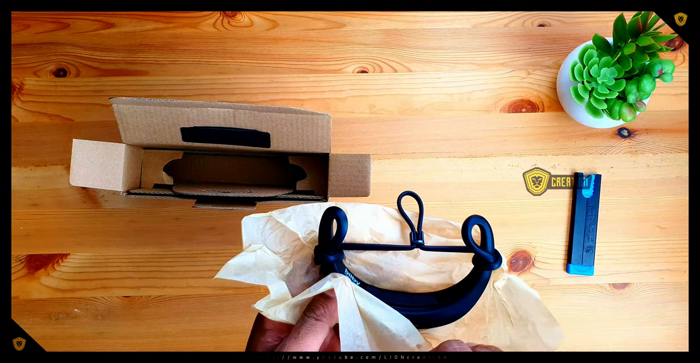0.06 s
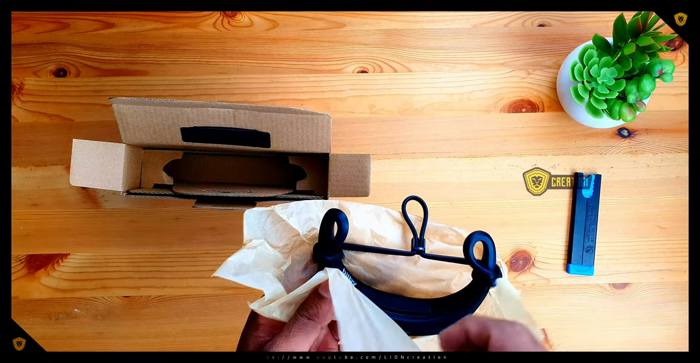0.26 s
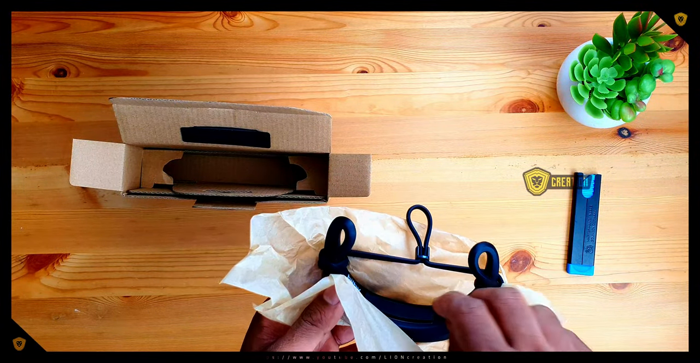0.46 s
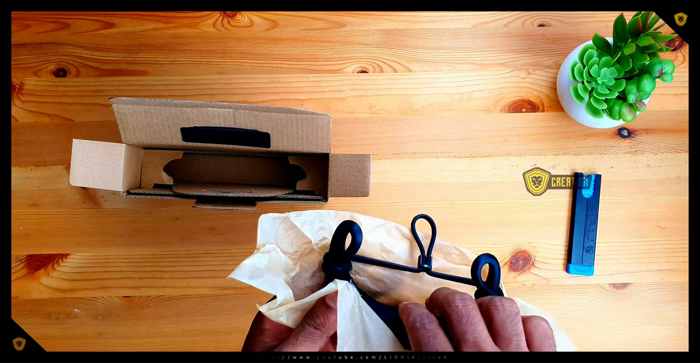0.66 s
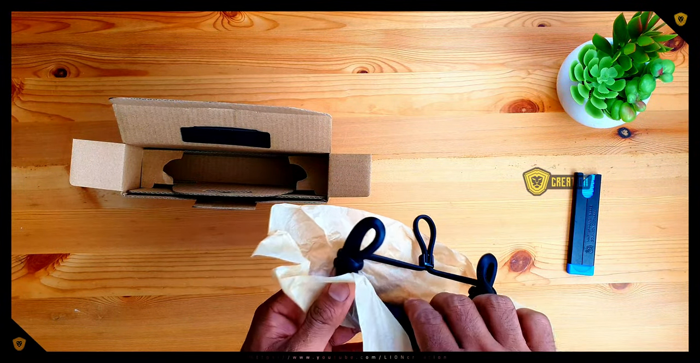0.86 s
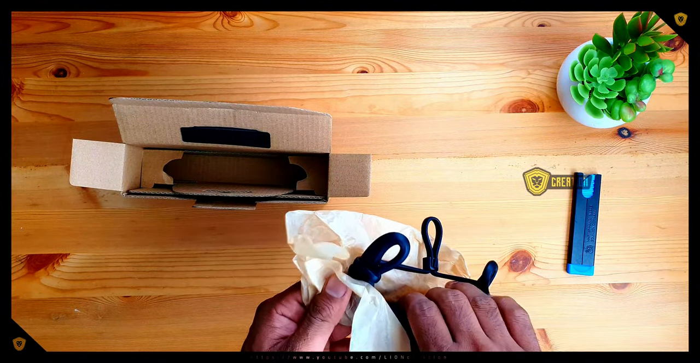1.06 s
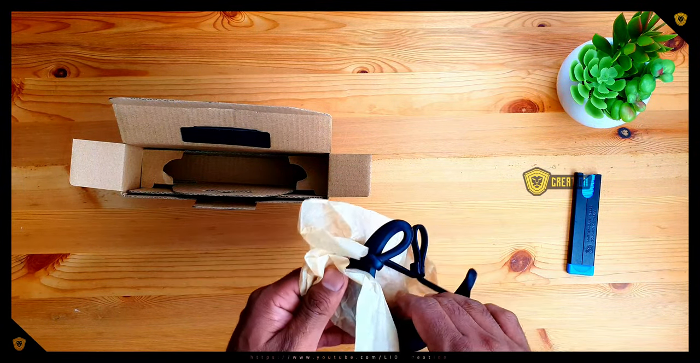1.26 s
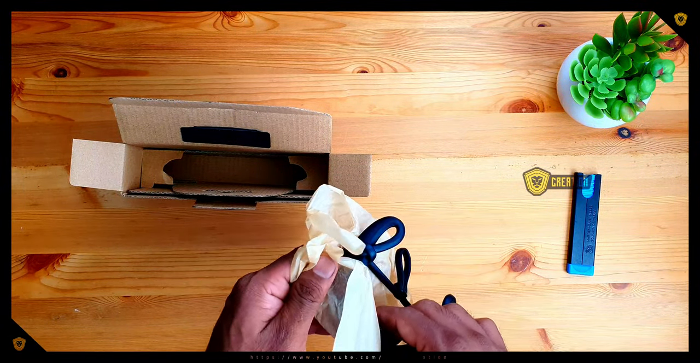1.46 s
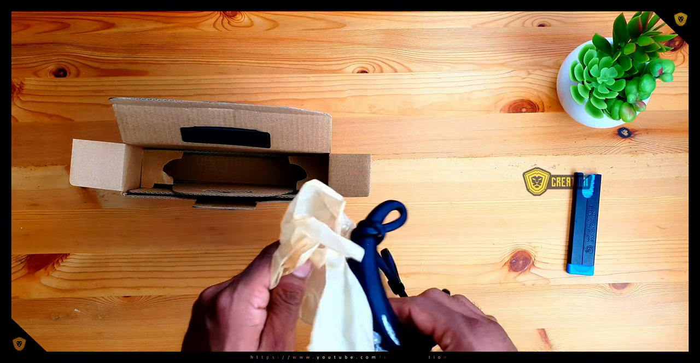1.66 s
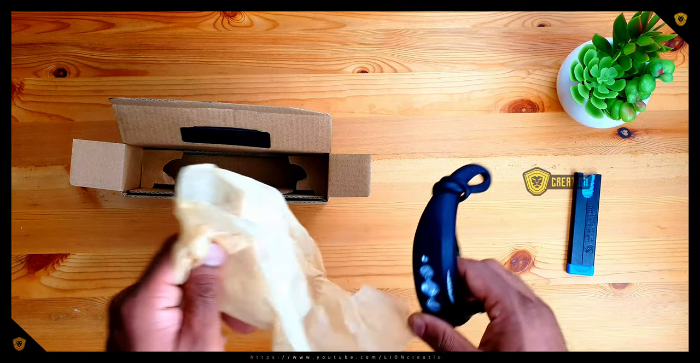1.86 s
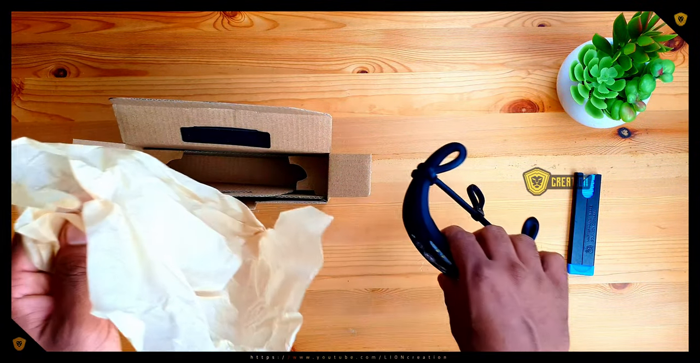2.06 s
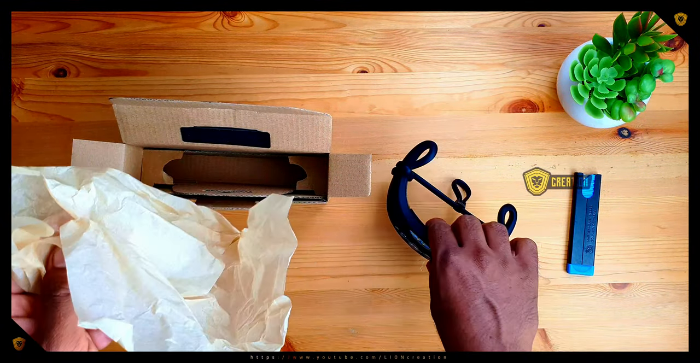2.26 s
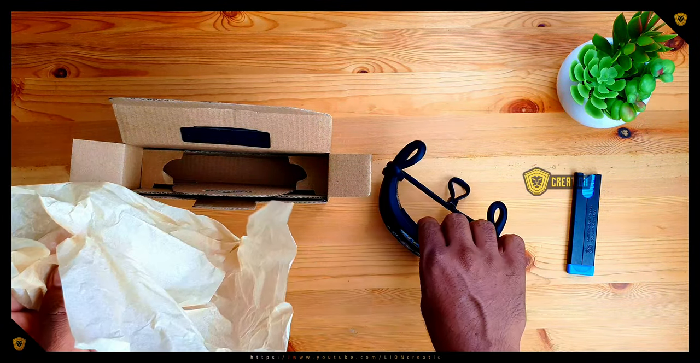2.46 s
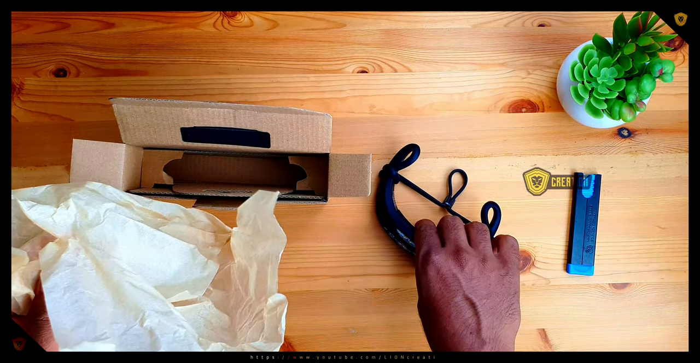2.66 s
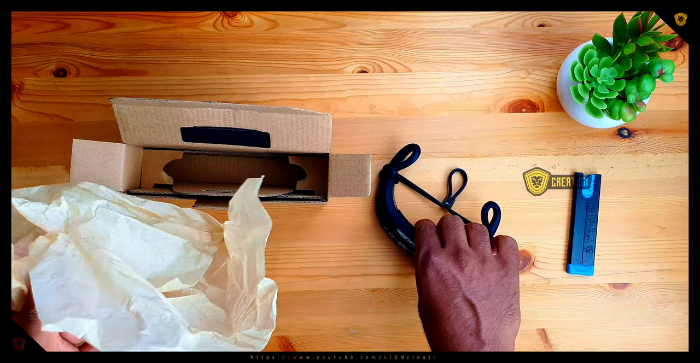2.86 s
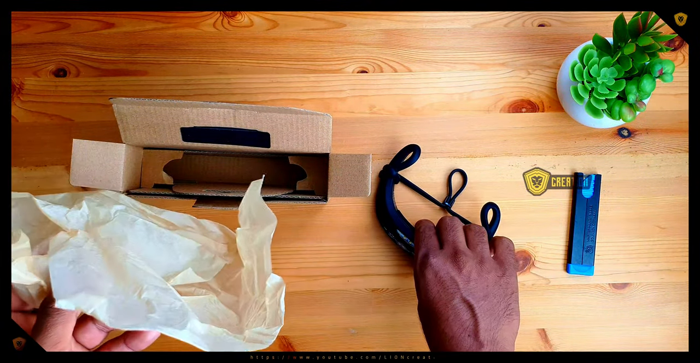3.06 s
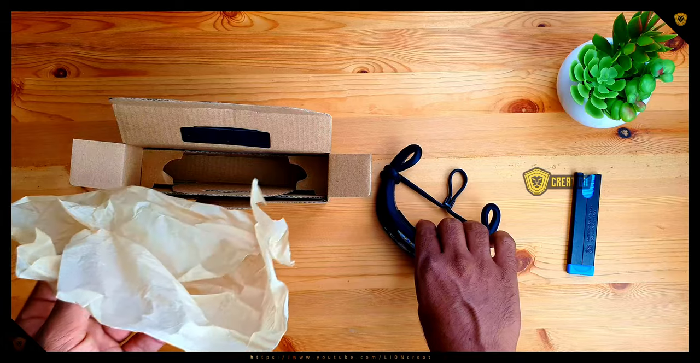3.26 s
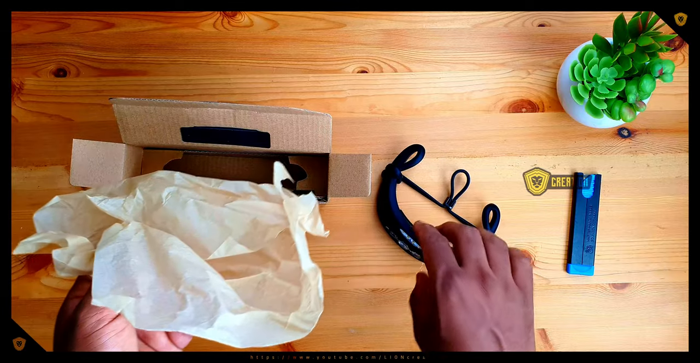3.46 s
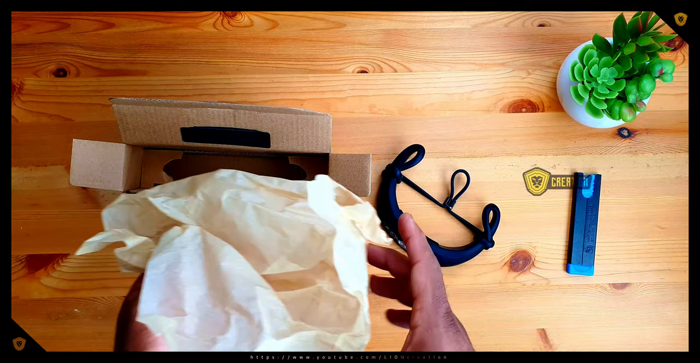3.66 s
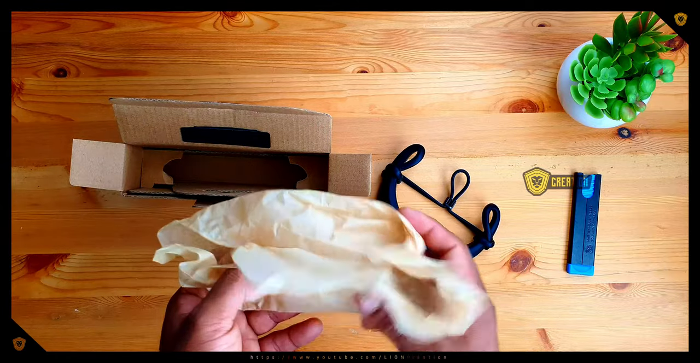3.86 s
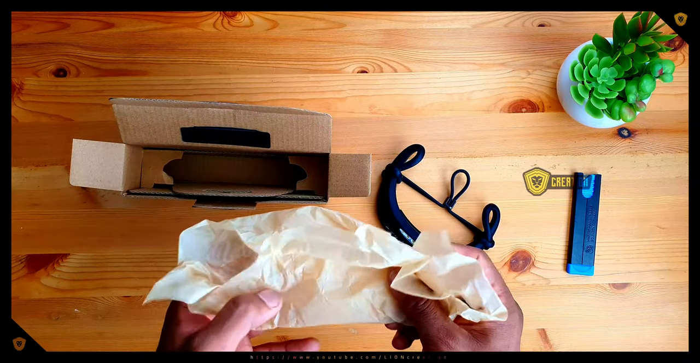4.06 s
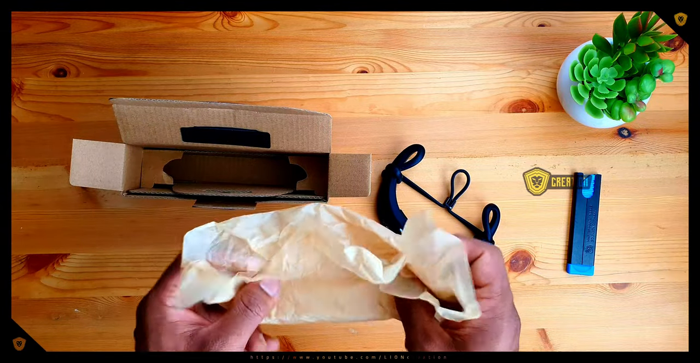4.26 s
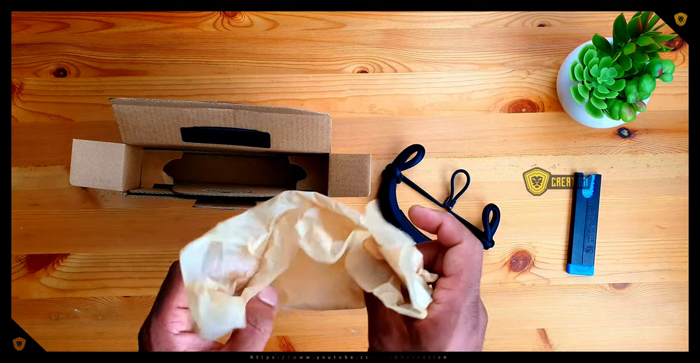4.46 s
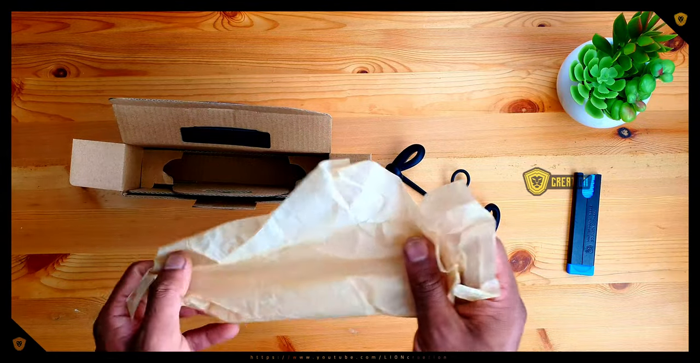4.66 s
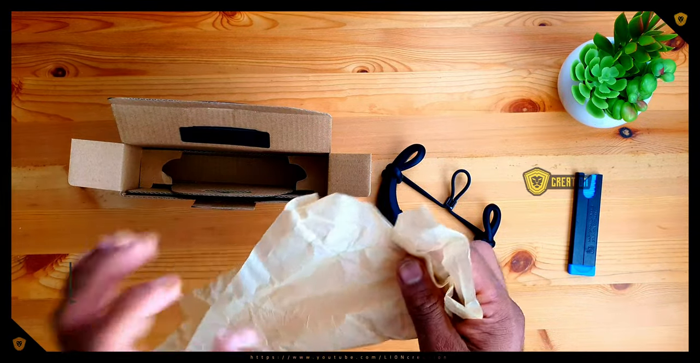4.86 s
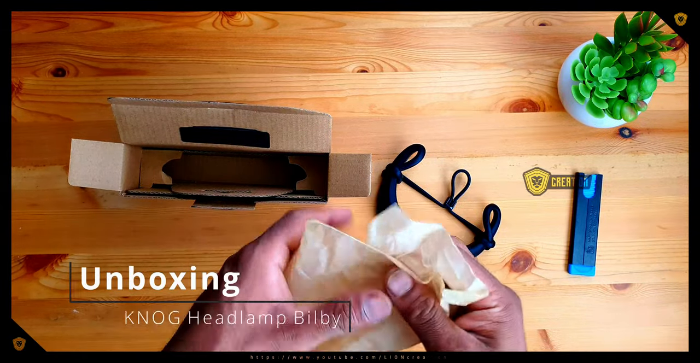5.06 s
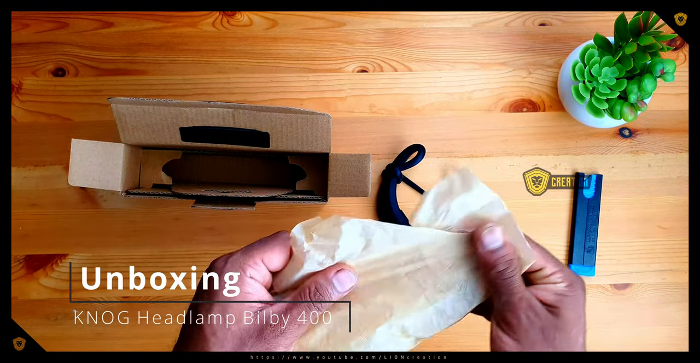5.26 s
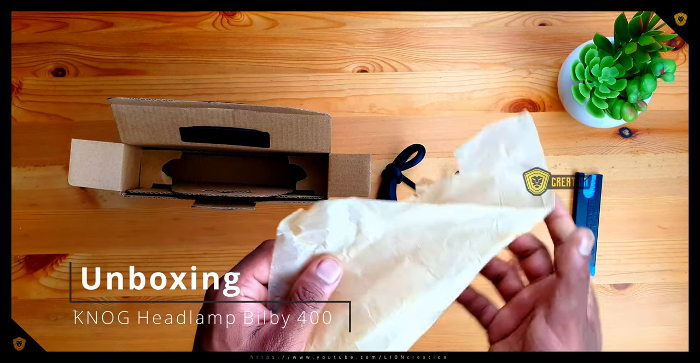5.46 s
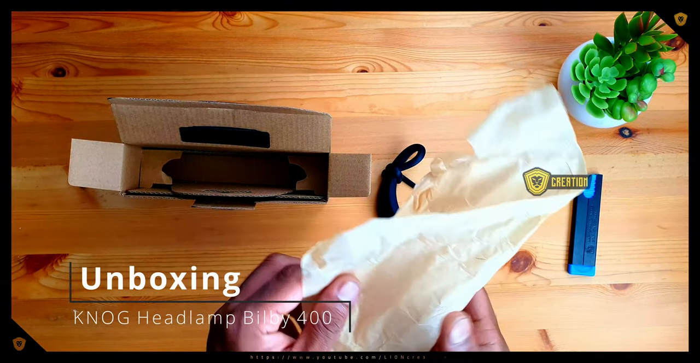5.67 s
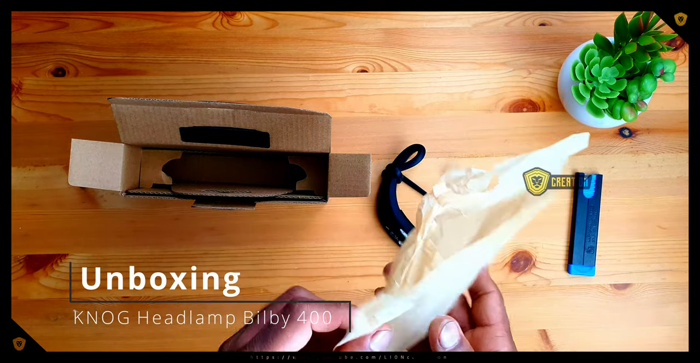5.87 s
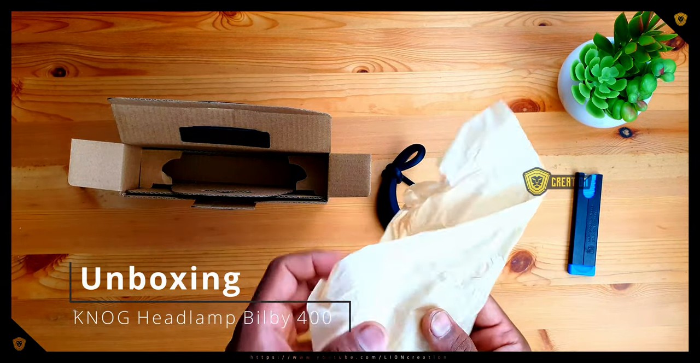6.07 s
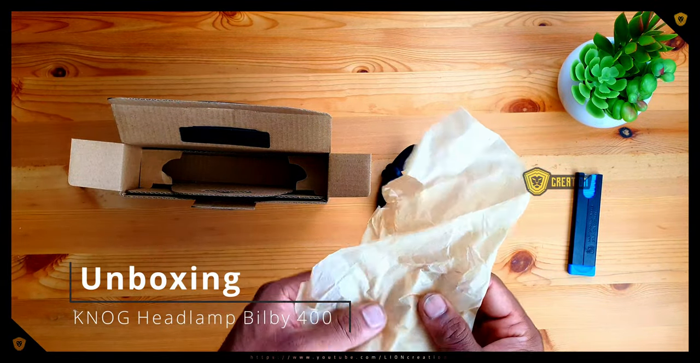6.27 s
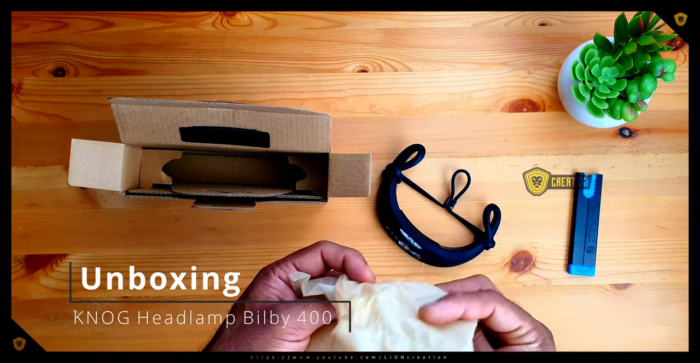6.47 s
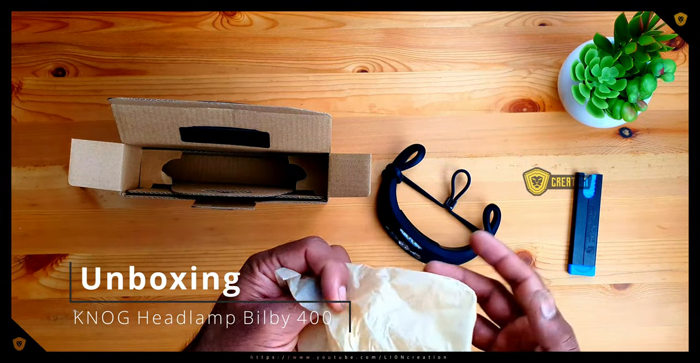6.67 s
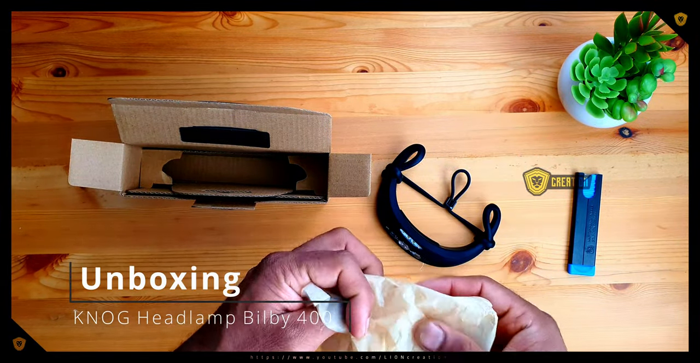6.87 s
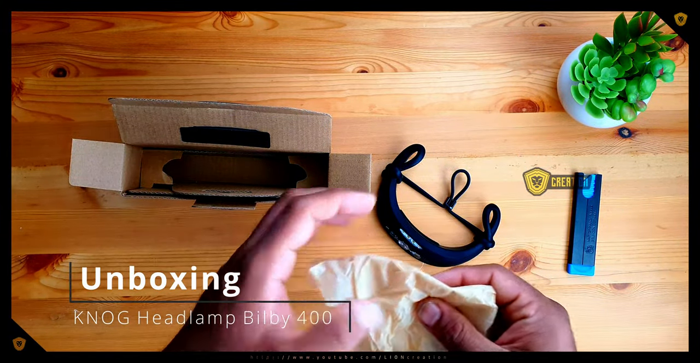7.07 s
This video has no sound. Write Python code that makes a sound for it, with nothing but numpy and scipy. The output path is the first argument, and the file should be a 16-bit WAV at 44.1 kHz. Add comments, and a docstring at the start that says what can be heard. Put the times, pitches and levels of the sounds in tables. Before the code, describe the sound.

A close, dry stereo sound of thin crisp wrapping paper handled over a wooden table in a small quiet room. At 0 s the sheet crackles with a short rasp as it drags along a strap, fading by 0.4 s. Separate creases snap at 0.3-0.7 s, then dense fizzing crinkle and sliding hiss run from about 0.8 to 1.8 s. From 1.9 to 2.4 s come brisk snaps and flutters, slightly left. It thins around 2.4-2.9 s to sparse ticks, with a soft low table bump at 2.7 s. Sharper snaps and pops gather from 3 to 3.7 s, with faint bumps near 3.4 s and light hollow carton taps at 3.15, 3.25 and a pair at 3.8 s. Bright crumpling follows almost continuously to 5.4 s, then snappier unfolding, and renewed full rustling from 5.9 s until the end at about 7.1 s.

```python
"""Thin tissue paper crackles as hands pull a strap out of it, then open, stretch and fold it over a table.
Shaped noise makes its clicks (random buckling), its fizz, its sliding hiss and its soft flutter.
Single creases snap, domes pop at a pitch, the strap rasps and a carton, flicked by the paper, taps hollowly.
Damped sine modes make soft bumps on the wooden table; sliding hands keep it booming faintly.
A short room tail and faint air noise surround the stereo pair."""
import sys
import numpy as np
from scipy import signal
from scipy.fft import rfft, irfft, next_fast_len
from scipy.io import wavfile
from scipy.ndimage import uniform_filter1d, map_coordinates

SR = 44100
rng = np.random.default_rng(int(sys.argv[2]) if len(sys.argv) > 2 else 0)


def write(x):
    x = np.atleast_2d(x).T
    wavfile.write(sys.argv[1], SR, np.round(np.clip(x, -1, 1) * 32767).astype(np.int16))


N = 313987


def amp(db):
    """Decibels to gain."""
    return 10 ** (np.asarray(db) / 20)


def unit(x):
    """x at rms 1."""
    return x / np.sqrt(np.mean(x ** 2) + 1e-20)


def along(points, hz):
    """(Hz, value) points interpolated on a log frequency axis."""
    f, v = np.transpose(points)
    return np.interp(np.log(hz + 1), np.log(f + 1), v)


def curves(rows):
    """One value per sample for each column after the time."""
    s, *cols = np.transpose(rows)
    return [np.interp(np.arange(N) / SR, s, c) for c in cols]


def wobble(knots_per_s):
    """Smooth random curve through normal-distributed knots."""
    knots = rng.standard_normal(int(N * knots_per_s / SR) + 4)
    return map_coordinates(knots, [np.arange(N) * knots_per_s / SR])


def coloured(x, level):
    """x through the causal minimum-phase filter whose gain in dB is level(Hz)."""
    n = x.shape[-1]
    m = 2 * next_fast_len(n // 2 + 2048)
    gain = amp(level(np.fft.rfftfreq(m, 1 / SR)))
    cepstrum = irfft(np.log(gain + 1e-6), m)
    # fold the cepstrum onto positive time
    cepstrum[1:m // 2] *= 2
    cepstrum[m // 2 + 1:] = 0
    response = np.exp(rfft(cepstrum))
    return irfft(rfft(x, m) * response, m)[..., :n]


def noise(spectrum):
    """Two unrelated noises of the given colour, rms 1."""
    return unit(coloured(rng.standard_normal((2, N)), lambda hz: along(spectrum, hz)))


def resonance(f, hz, width_hz):
    """Power response of one resonance, peak 1."""
    return 1 / (1 + (2 * (f - hz) / width_hz) ** 2)


def ringing(modes):
    """Two noises through a set of resonances (Hz, width Hz, dB), rms 1."""
    def level_db(f):
        power = sum(amp(2 * db) * resonance(f, hz, width_hz) ** 2 for hz, width_hz, db in modes)
        return 10 * np.log10(power)

    return unit(coloured(rng.standard_normal((2, N)), level_db))


def add(track, s, sound):
    """Mix a sound into a track from time s."""
    part = track[:, max(round(s * SR), 0):][:, :sound.shape[-1]]
    part += sound[..., :part.shape[-1]]


def handling():
    """Strokes rise, sag and die over the stirring sheet; crackle, fizz, slide, flutter as relative dB."""
    # pulls and squeezes: t/s, length/s, crackle/dB, fizz over crackle/dB, slide/dB, flutter over slide/dB
    strokes = [(0.0, 0.21, -30, -1, -35, -11), (0.223, 0.047, -32, -2, -43, -20),
               (0.471, 0.08, -33.5, -1, -46.5, -7), (0.694, 0.058, -30, -1, -32.5, -14),
               (0.797, 0.18, -31, -0.5, -35.5, -27), (1.004, 0.04, -27.5, 0, -39.5, -13),
               (1.107, 0.04, -38, 1, -40, -16), (1.16, 0.583, -31, 0.5, -36, -16),
               (1.826, 0.042, -28, -4, -39, -16), (1.977, 0.081, -30.5, -8, -38, -6),
               (2.18, 0.089, -45, -12, -41.5, -6.5), (2.957, 0.032, -37, -8, -44.5, -14),
               (3.135, 0.025, -43, -8, -40.5, -15), (3.227, 0.024, -37, -12, -37, -21),
               (3.344, 0.042, -29.5, -6.5, -39, -6.5), (3.515, 0.018, -37, -3, -47, -6),
               (3.785, 0.27, -29.5, -4.5, -35, -12.5), (4.159, 0.16, -29.5, -3.5, -34.5, -8.5),
               (4.36, 0.13, -39.5, 4.5, -34.5, -16), (4.506, 0.27, -31.5, 0.5, -35, -10.5),
               (4.818, 0.11, -33.5, -7, -40.5, -29), (4.991, 0.087, -28.5, -5.5, -37, -24),
               (5.102, 0.34, -29, -2, -33.5, -9), (5.53, 0.13, -41, 4, -48, -16),
               (5.74, 0.12, -34.5, 0.5, -47.5, -11), (5.874, 0.058, -30, -1, -35, -15),
               (5.975, 0.24, -29, -2.5, -37.5, -11.5), (6.236, 0.1, -28.5, -0.5, -34.5, -7.5),
               (6.345, 0.12, -28, -0.5, -35, -14), (6.479, 0.16, -29.5, -1.5, -38, -17),
               (6.652, 0.15, -35.5, 0, -44.5, -33), (6.862, 0.042, -26, -2, -39, -17),
               (6.909, 0.04, -28, -2, -37.5, -7), (6.966, 0.072, -31.5, -2, -40, -24),
               (7.081, 0.03, -35.5, 0, -41, -22)]
    # stirring between strokes: t/s, crackle/dB, slide/dB
    stirring = [(0, -45, -48), (0.33, -42.5, -45.5), (0.6, -45, -44.5), (0.8, -36.5, -41),
                (1.9, -34.5, -41.5), (2.1, -42, -42), (2.34, -43, -44.5), (2.42, -50.5, -43),
                (2.66, -53, -44), (2.75, -61, -52), (2.92, -53, -49.5), (3.05, -48, -44),
                (3.55, -40.5, -42), (3.61, -53, -54), (3.75, -57, -48.5), (3.9, -30, -35),
                (4.9, -32.5, -41.5), (7.12, -38.5, -49.5)]
    attack_s, release_s = 0.039, 0.11  # 60 dB ramps
    sag_db_per_s = 5.5
    stir_fizz_db, stir_flutter_db = -3, -13  # over crackle, over slide

    t = np.arange(N) / SR
    stir_db, rub_db = curves(stirring)
    power = amp([stir_db, stir_db + stir_fizz_db, rub_db, rub_db + stir_flutter_db]) ** 2
    for s, length_s, db, fizz_db, slide_db, flutter_db in strokes:
        rise_db = 60 * np.minimum(t - s, 0) / attack_s
        fall_db = -60 * np.maximum(t - s - length_s, 0) / release_s
        sag_db = -sag_db_per_s * (t - s - length_s / 2)
        shape_db = rise_db + fall_db + sag_db
        on = shape_db > -60
        gains = amp([db, db + fizz_db, slide_db, slide_db + flutter_db])
        power[:, on] += np.outer(gains, amp(shape_db[on])) ** 2
    return 10 * np.log10(power)


def buckle(t, t60, tail_db, tail_t60):
    """Envelope of one facet flipping: a short crack, then a weaker, longer shiver through the sheet."""
    crack = amp(-60 * t / t60)
    shiver = amp(tail_db - 60 * t / tail_t60)
    return (crack + shiver) / (1 + amp(tail_db))


def crackle(clicks_per_s, spread_db, clump_db):
    """Summed envelope of facets that click at random, each with its own size, rms 1."""
    rate = np.clip(clicks_per_s, 400, 8000)
    # buckling comes in avalanches, which even out when many creases move together
    clumps = amp(clump_db * wobble(70) * np.sqrt(500 / rate))
    size = amp(spread_db * np.clip(rng.standard_normal(N), -2, 2))
    struck = rng.random(N) < rate / SR
    power = struck * (size * clumps) ** 2 / rate
    click = buckle(np.arange(SR // 20) / SR, t60=0.005, tail_db=-11, tail_t60=0.06)
    return unit(np.sqrt(np.abs(signal.oaconvolve(power, click ** 2)[:N])))


def flexed(x, fold_db, bend_db):
    """A sheet changing shape shifts its colour: quickly with small folds, slowly with large bends."""
    def field(shape, bins, frames):
        across = uniform_filter1d(rng.standard_normal(shape), bins, -2)
        return unit(uniform_filter1d(across, frames, -1))

    z = signal.stft(x, nperseg=256)[2]
    folds = field(z.shape, 7, 6)
    bends = field(z.shape[1:], 5, 40)  # same in both channels
    shifted = z * amp(fold_db * folds + bend_db * bends)
    return unit(signal.istft(shifted, nperseg=256)[1][:, :N])


def rustle(crackle_db, fizz_db, slide_db, flutter_db):
    """Moving paper crackles, rubs on itself and flaps softly; a firmer stroke buckles it more finely."""
    # colours of the clicks, their fizz, the sliding and the flutter: f/Hz, relative density/dB
    crackle_colour = [(100, -61), (600, -38), (1500, -19.5), (2500, -4.5), (3300, -4), (4500, -1.5),
                      (5600, 1), (7000, 2.5), (8300, -3), (9500, -12.5), (12000, -21.5)]
    fizz_colour = [(3000, -69), (7000, -13), (8600, -1.5), (10000, 1), (11700, 4.5), (13500, 1),
                   (16000, -3)]
    slide_colour = [(100, -49), (400, -23.5), (750, -5.5), (1000, -6.5), (1300, -1.5), (1700, -1.5),
                    (2300, -6.5), (3000, 3), (4500, -5.5), (8000, -11), (16000, -32)]
    flutter_colour = [(25, -60), (50, -41), (80, -7), (120, -8), (200, -5), (300, 2.5), (550, 2),
                      (900, 3.5), (2000, -17), (8000, -48)]
    firm_slide_db, firm_clicks_per_s = -36, 3000
    rate_exponent = 1.4  # click rate against sliding amplitude

    def sheet(colour):
        return flexed(noise(colour), fold_db=1.7, bend_db=1.0)

    clicks_per_s = firm_clicks_per_s * amp(rate_exponent * (slide_db - firm_slide_db))
    grain = crackle(clicks_per_s, spread_db=1.0, clump_db=-1.5)
    coarse = amp(crackle_db - 2.1) * sheet(crackle_colour)
    fizz = amp(fizz_db + 0.25) * sheet(fizz_colour)
    slide = amp(slide_db - 2) * unit(grain ** 0.39) * sheet(slide_colour)
    flaps = unit(noise(flutter_colour) * amp(3.5 * wobble(40)))
    return grain * (coarse + fizz) + slide + amp(flutter_db - 5.0) * flaps


def scrape():
    """The wrapping rasps along the strap as it is pulled off: fluctuating noise in the strap's modes."""
    # t/s, mean level before wobble/dB
    rasp = [(0, -42), (.06, -37), (.13, -47), (.19, -38.5), (.26, -44), (.32, -63), (.4, -110)]
    # strap resonances: f/Hz, width/Hz, relative level/dB
    strap_modes = [(1860, 140, -1), (2090, 230, 3), (2560, 270, 5)]
    return amp(curves(rasp)[0] + 5.0 * wobble(59.5)) * ringing(strap_modes)


def drag():
    """Hands and strap sliding on the wood keep two of its modes faintly alive."""
    # t/s, low mode/dB, high mode/dB
    boom = [(0, -68, -85), (0.65, -65, -69), (0.9, -78, -88), (2.1, -72, -71), (2.55, -67, -58),
            (2.9, -75, -66), (3.6, -69, -63.5), (3.77, -77, -56), (3.9, -93, -78), (7.1, -86, -94)]
    low_db, high_db = curves(boom)
    return amp(low_db) * ringing([(92.6, 15, 0)]) + amp(high_db) * ringing([(219.4, 31, 0)])


def air():
    """Still air of the room: steady coloured noise."""
    # f/Hz, relative density/dB
    air_colour = [(25, 7), (50, -16), (85, -7), (150, -13), (230, 0.5), (295, 12), (390, -3), (520, 6),
                  (850, -31), (1300, -11), (4000, -13), (16000, -34)]
    return amp(-64.0) * noise(air_colour)


def snaps(rows):
    """Stiff creases strain and give way one at a time: noise bursts, each with its own brightness."""
    rise_s = 0.0074  # 60 dB
    flat_t60_s, t60_exponent = 0.033, 0.19  # t60 at 0 dB body; more body rings longer
    out, lead = np.zeros((2, N)), SR // 20
    t = np.arange(-lead, 2 * lead) / SR
    for s, db, body_db, top_db in rows:
        colour = [(100, body_db - 11), (600, body_db - 10.5), (1300, body_db - 1.0), (2200, body_db + 0.5),
                  (3500, -0.92), (7000, 0.66), (11000, top_db - 2.5), (16000, top_db - 4.5)]
        t60 = flat_t60_s * amp(t60_exponent * body_db)
        strain = amp(60 * np.minimum(t, 0) / rise_s)
        shape = strain * buckle(np.maximum(t, 0), t60, tail_db=-13, tail_t60=0.09)
        crack = coloured(shape * rng.standard_normal((2, len(t))), lambda hz: along(colour, hz))
        add(out, s - lead / SR, amp(db + 4.0) * crack)
    return out


def small_snaps(crackle_db):
    """Lesser creases give way at random times, their level following the crackle."""
    snaps_per_s, spread_db = 42, 2.5
    rows, draws = [], rng.random(size=(600, 5))
    for when, chance, size, body, top in draws:
        if chance < snaps_per_s * N / SR / len(draws):
            db = crackle_db[int(when * N)] + spread_db * (2 * size - 1)
            rows.append((when * N / SR, db, -24 + 16 * body, -4 + 9 * top))
    return snaps(rows)


def single_snaps():
    """The louder creases that give way one at a time."""
    # t/s, relative level/dB, relative body/dB, relative top/dB
    crease_rows = [(0.2906, -29, -12, 9), (0.3, -22, -21, -1), (0.348, -37, -1, -7),
                   (0.3589, -26.5, -5.5, 2), (0.3766, -31, -6, -1), (0.4225, -26, -13, 5.5),
                   (0.460, -34, -1, 10), (0.4786, -29, -9, 13), (0.4968, -34, -17, 12),
                   (0.516, -24, -15, 4), (0.544, -24, -5, 2), (0.615, -28, -3.5, -2), (0.6266, -28, -8, -6),
                   (0.6685, -25, -3, 3), (0.6761, -20, -15, 0), (0.797, -23.5, -15, 0),
                   (1.075, -20, -31, 0), (1.103, -26, -17, 1), (1.122, -26, -14, -2), (1.9033, -23, -9, -3),
                   (1.962, -26, -6.5, 3), (2.061, -25.5, -14, 6), (2.1329, -28.5, -7, 0),
                   (2.154, -27, -2, 7.5), (2.1963, -28, -18, 5), (2.207, -29, -10, -2),
                   (2.2306, -27.5, 1.5, 3), (2.269, -23, -24, -1), (2.2806, -39, -21, -4),
                   (2.311, -22, -12.5, 6.5), (2.334, -29, -12, 3), (2.366, -32, -21, 4),
                   (2.509, -30, 2.5, -9), (2.5176, -28, -18, -4), (2.6402, -37, -8, -2),
                   (2.786, -36.5, -24, 11.5), (2.8245, -29, -8, 1), (2.8608, -28.5, -9, 2.5),
                   (2.869, -30, -6, 0), (2.8795, -27.5, -8.5, -4), (2.9182, -49, -16, -9),
                   (2.996, -30, -19, -5), (3.018, -29, -3.5, 4), (3.0603, -28.5, -5.5, 0),
                   (3.0918, -31, -28, -17), (3.1515, -25, -14, -4), (3.1705, -26.5, -7, 1.5),
                   (3.1995, -27, -21, -19), (3.22, -26.5, -2, -16), (3.232, -23.5, -17, 2),
                   (3.2478, -22, -2.5, -5), (3.2952, -20.5, -28, -4), (3.3238, -25, -7.5, -20),
                   (3.344, -24, -18, 2), (3.372, -26, -18, -5), (3.4036, -23, -19, -2),
                   (3.447, -17.5, -19, -2.5), (3.464, -24, -11, -19), (3.4968, -30, -5, 2),
                   (3.527, -21.5, -14, 4), (3.5456, -29, -4, 4), (3.5746, -17.5, -25, -8),
                   (3.6419, -38, -5, -15), (3.6625, -23.5, -10, -6), (3.668, -30.5, -2.5, -7),
                   (3.7121, -34, -26, 1), (3.7274, -37, -5, -19), (3.764, -36, 5, -17),
                   (3.7798, -31, -5, -7), (3.801, -25, -5, -4), (3.8101, -26, -6, -3), (4.39, -30, -10, 3),
                   (4.8726, -23, -16, 1), (4.995, -27, -0.5, 7), (5.49, -27.5, -6, 2), (5.5243, -24, -8, 1),
                   (5.5637, -22, -10, 4), (5.626, -20.5, -14, -4), (5.7436, -24, -17, 0),
                   (5.8012, -24, -5.5, 4), (5.958, -27, -22, -4), (5.9693, -26, -6, 5), (6.009, -49, -7, 1),
                   (6.2327, -26, -15, -9), (6.6598, -31, -8, -1), (6.709, -28, -21, 10),
                   (6.766, -35, -2, 13), (6.8294, -28, -6.5, -1), (6.8669, -39, -13, 6),
                   (7.0704, -23, -9, -0.5)]
    return snaps(crease_rows)


def pops():
    """A larger dome of paper that inverts rings roughly at its own pitch: decaying narrow-band noise."""
    # t/s, f/Hz, level/dB, t60/s
    domes = [(.288, 2120, -31, .06), (.299, 2130, -32, 0.043), (0.42, 4140, -20.5, 0.025),
             (.668, 2150, -30, .05), (1.961, 4540, -30, 0.044), (2.228, 2060, -34, 0.07),
             (3.092, 4400, -27, 0.034), (3.246, 2280, -24.5, 0.075), (3.323, 3270, -22, 0.033),
             (5.56, 4470, -27, .04), (6.659, 3330, -29, .05), (7.069, 4630, -25, 0.031)]
    out, t = np.zeros((2, N)), np.arange(SR // 8) / SR
    for s, hz, db, t60 in domes:
        burst = rng.standard_normal((2, len(t)))
        tone = unit(coloured(burst, lambda f: 20 * np.log10(resonance(f, hz, 0.15 * hz))))
        add(out, s, tone * amp(db - 60 * t / t60))
    return out


def flicks():
    """Paper edges catch the open carton, whose flaps answer with a short hollow tap."""
    # t/s, level/dB, t60/s
    taps = [(2.228, -38, 0.077), (3.149, -28, 0.11), (3.244, -33, 0.065), (3.777, -26, 0.056),
            (3.799, -25.5, 0.055)]
    # flap modes: f/Hz, width/Hz, relative level/dB
    flap_modes = [(1210, 120, -11), (1310, 280, 5), (1650, 200, -19), (2190, 170, -4)]
    blows, t = np.zeros((1, N)), np.arange(SR // 5) / SR
    for s, db, t60 in taps:
        add(blows, s, amp(db - 60 * t / t60) * (1 - np.exp(-t / 0.00064)))
    return blows * ringing(flap_modes)


def bumps():
    """Soft contacts set the table top booming briefly in damped sine modes; a resting hand damps it."""
    # t/s, relative level/dB, pitch ratio, ring length ratio
    blows = [(2.673, -30, 1.01, 1.0), (2.752, -43, 0.63, 0.85), (3.407, -37.5, 1.08, 0.43),
             (3.44, -49, 1.3, 0.52), (3.488, -36, 0.87, 0.37)]
    # table top modes before the ratios: f/Hz, relative level/dB, t60/s
    table_modes = [(86, -5, 0.22), (146.4, 6, 0.15), (236.5, -3.5, 0.18), (270, -8.5, 0.2),
                   (337, -29, 0.053)]
    out, t = np.zeros((2, N)), np.arange(SR // 3) / SR
    for s, db, ratio, length in blows:
        ring = sum(amp(level_db - 60 * t / (t60 * length)) * np.sin(2 * np.pi * hz * ratio * t)
                   for hz, level_db, t60 in table_modes)
        add(out, s, amp(db + 1.5) * ring * (1 - np.exp(-t / 0.0043)))
    return out


def cavity(x, modes, share):
    """A nearby hollow lifts its own resonances, the more the closer it is (share 0-1)."""
    def boost_db(f):
        return sum(db * resonance(f, hz, width_hz) for hz, width_hz, db in modes)

    return x + share * (coloured(x, boost_db) - x)


def hollows(sheet):
    """The hollow between the hands and the open carton colour the sheet as it moves."""
    # t/s, cupped between the hands/0-1, close to the carton/0-1
    sheet_place = [(0, 0.7, 0.9), (0.7, 0.83, 0.75), (1.2, 0.53, 0.42), (2.0, 0.23, 1), (3.2, 0.57, 1),
                   (3.8, 0.6, 1), (4, 0.53, 0.57), (5.5, 0.37, 0.8), (6.4, 1, 1), (7.1, 1, 1)]
    # resonances of hands and carton: f/Hz, width/Hz, boost at full share/dB
    hand_modes = [(1795, 53, 5.5), (2010, 260, 5), (2226, 138, 8.5), (3240, 280, 5.5), (4250, 79, 5.5)]
    carton_modes = [(713, 41, 2.5), (1162, 100, 7.9), (1345, 150, 8.4)]
    cupped, near = curves(sheet_place)
    return cavity(cavity(sheet, hand_modes, cupped), carton_modes, near)


def room(x):
    """The walls answer after 5 ms with a short noise tail whose decay time varies with frequency."""
    # f/Hz, t60/s
    decay = [(150, 0.18), (1300, 0.053), (5000, 0.16), (15000, 0.081)]
    hz, t, z = signal.stft(rng.standard_normal((2, SR // 3)), SR, nperseg=256)
    tail = signal.istft(z * amp(-60 * t / along(decay, hz)[:, None]), SR, nperseg=256)[1]
    tail = np.pad(tail / np.linalg.norm(tail[0]), ((0, 0), (SR // 200, 0)))
    return signal.fftconvolve(x, tail, axes=1)[:, :N]


def microphones(pair):
    """Spaced capsules: likeness, level and phase differ with frequency; the left leads slightly."""
    # f/Hz, left-right correlation
    likeness = [(40, -0.34), (130, 0.54), (350, 0.68), (700, 0.27), (1250, 0.84), (1650, 0.1), (2100, 0.57),
                (2900, -0.019), (4500, 0.1), (6200, 0.011), (8000, -0.098), (16000, 0.15)]
    # f/Hz, left over right/dB
    left_lean = [(60, 0), (140, -6.5), (210, -0.5), (500, -4), (1170, -2), (2740, -1), (4190, -4.5),
                 (6700, -2.5), (7400, -2.5), (8300, 2.5), (9300, 0), (10800, -2.5), (15000, -1)]
    # f/Hz, left ahead of right/rad
    left_lead = [(300, 0.083), (750, 0.7), (1250, 0.42), (1650, 0.85), (2150, 0.55), (2800, 0.36),
                 (4000, 0.64)]
    m = next_fast_len(N + SR // 4)
    hz = np.fft.rfftfreq(m, 1 / SR)
    turn = np.arccos(np.clip(along(likeness, hz), -1, 1)) / 2
    mid, side = rfft(pair, m) * [np.cos(turn), np.sin(turn)]
    lean = amp(along(left_lean, hz) / 2) * np.exp(1j * along(left_lead, hz) / 2)
    return irfft([(mid + side) * lean, (mid - side) / lean], m)[:, :N]


def sway(pair):
    """The sheet is held out to the left for a while: a slow shift of balance."""
    # t/s, additional left over right/dB
    balance = [(0, 1.2), (1.9, 1), (2.14, 3), (3.5, 2), (3.8, 1.9), (7.12, 1.3)]
    return amp(curves(balance)[0] * np.array([[1], [-1]]) / 2) * pair


def scene():
    """Paper, carton and table in a small quiet room; the bumps stay dry and centred."""
    crackle_db, fizz_db, slide_db, flutter_db = handling()
    sheet = rustle(crackle_db, fizz_db, slide_db, flutter_db) + single_snaps() + small_snaps(crackle_db)
    contacts = scrape() + pops() + flicks()
    paper = contacts + hollows(sheet)
    background = drag() + air()
    heard = microphones(paper + amp(-13.5) * room(paper) + background)
    return sway(heard) + bumps()


def record(dry):
    """Cut the deep bass and everything above a sharp band limit."""
    low_cut_hz, top_hz = 62, 15900
    thin = signal.sosfilt(signal.butter(3, low_cut_hz, "high", fs=SR, output="sos"), dry)
    m = next_fast_len(N + SR // 4)
    return irfft(rfft(thin, m) * (np.fft.rfftfreq(m, 1 / SR) < top_hz), m)[:, :N]


dry = scene()
out = record(dry)
write(out)
```